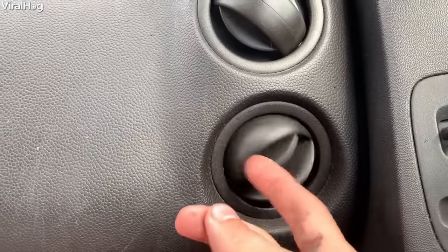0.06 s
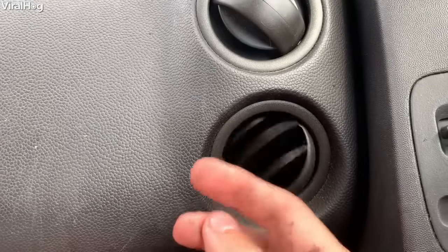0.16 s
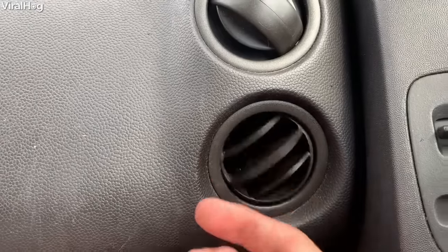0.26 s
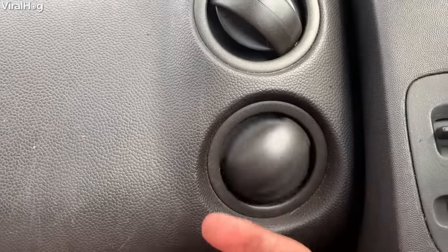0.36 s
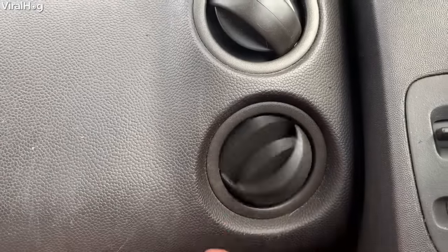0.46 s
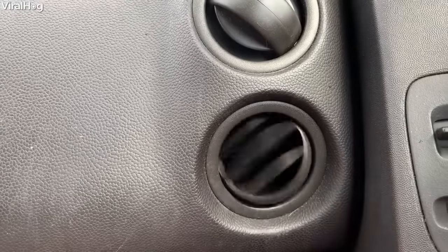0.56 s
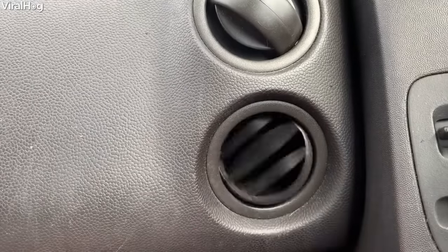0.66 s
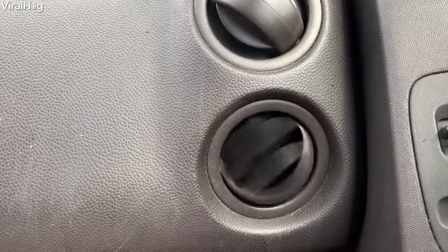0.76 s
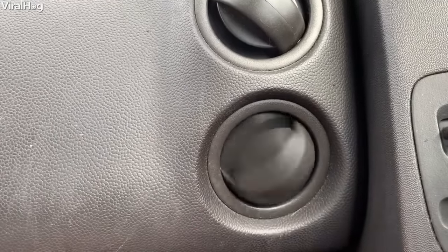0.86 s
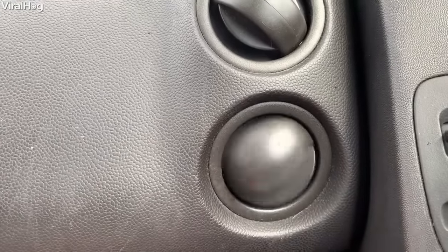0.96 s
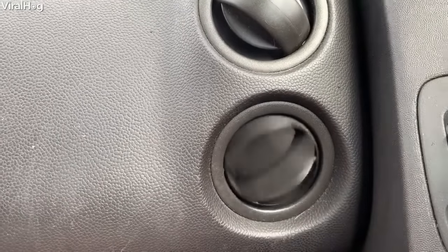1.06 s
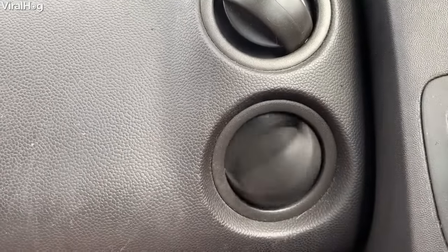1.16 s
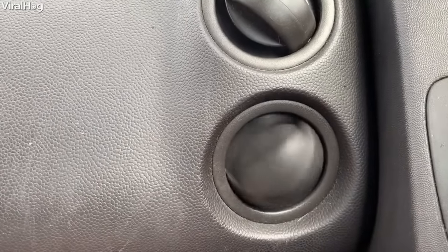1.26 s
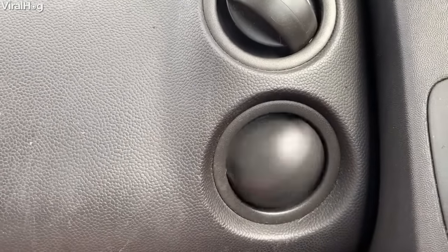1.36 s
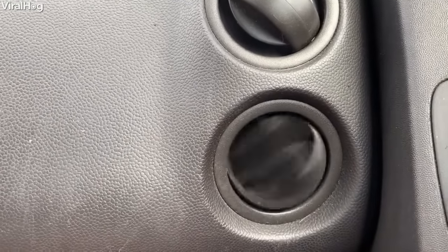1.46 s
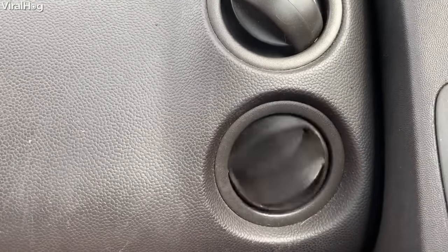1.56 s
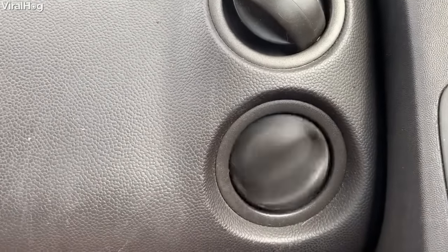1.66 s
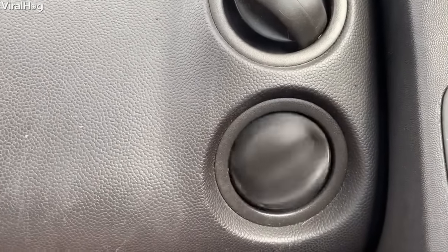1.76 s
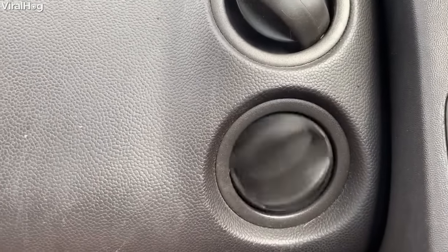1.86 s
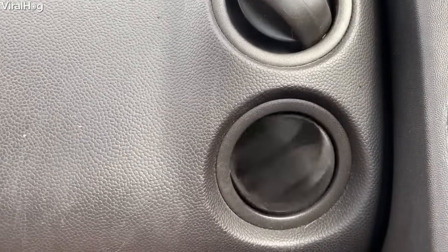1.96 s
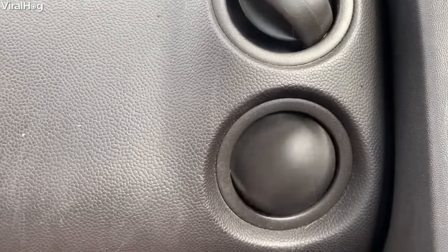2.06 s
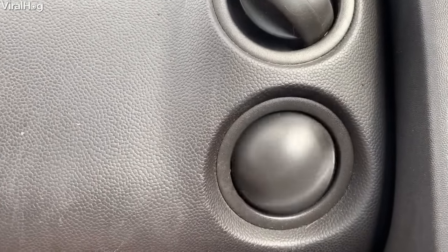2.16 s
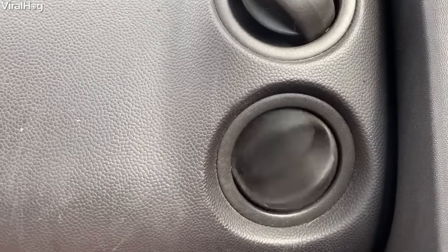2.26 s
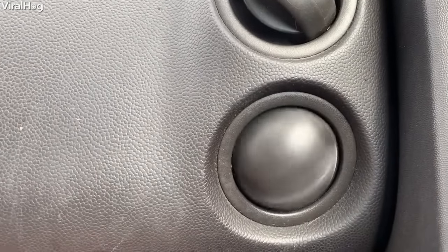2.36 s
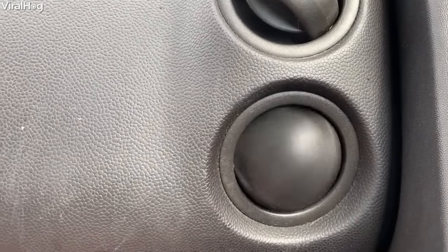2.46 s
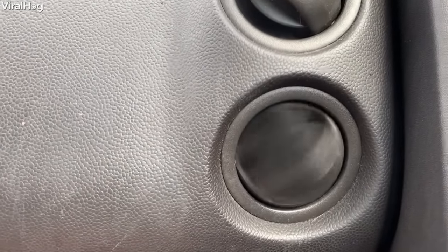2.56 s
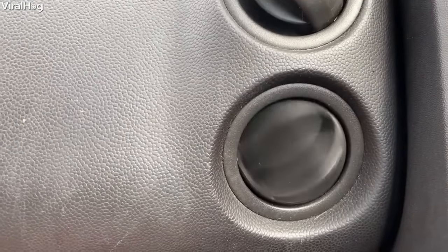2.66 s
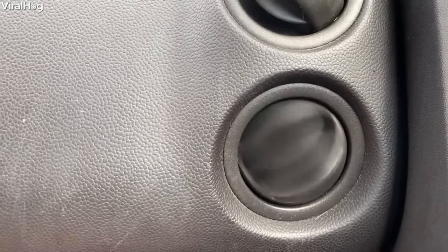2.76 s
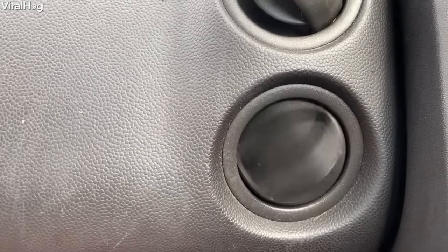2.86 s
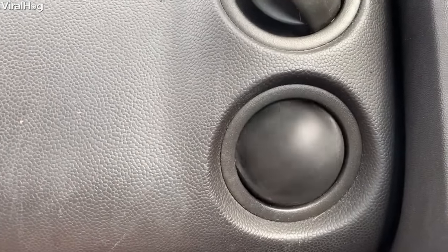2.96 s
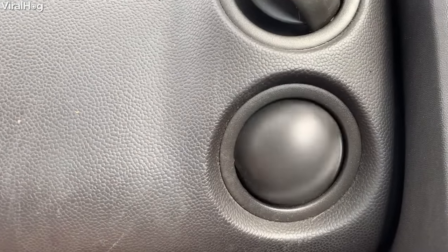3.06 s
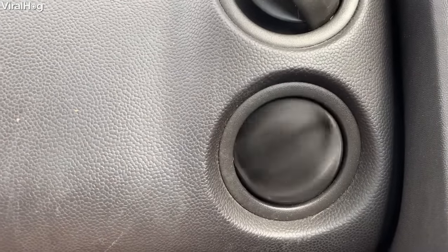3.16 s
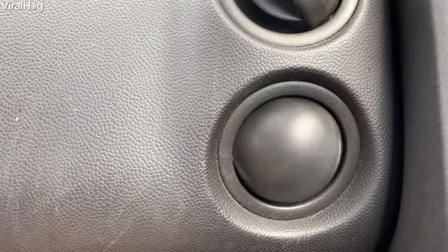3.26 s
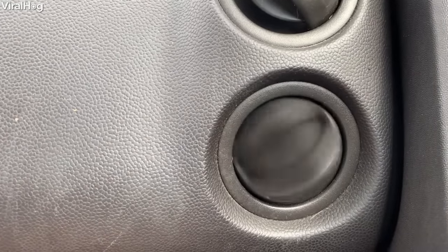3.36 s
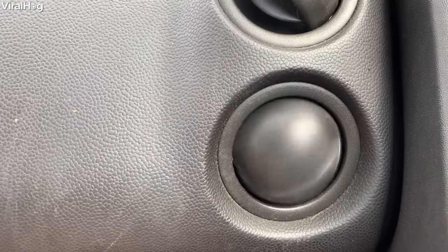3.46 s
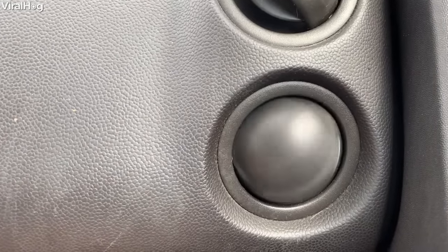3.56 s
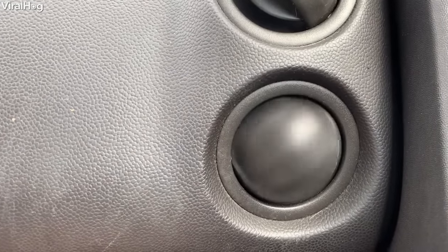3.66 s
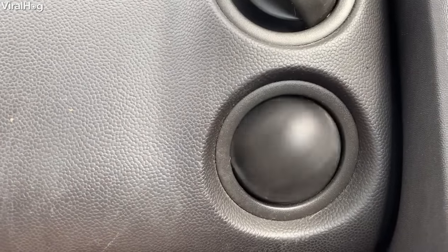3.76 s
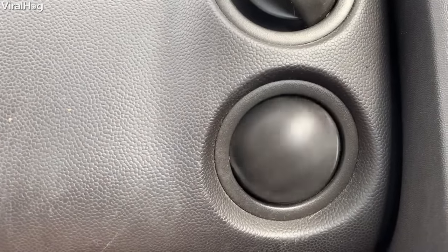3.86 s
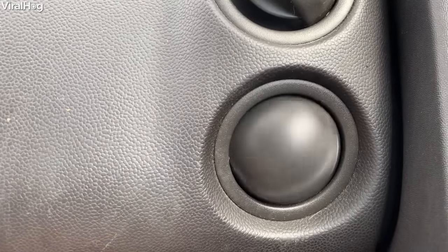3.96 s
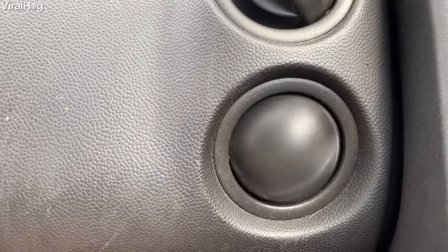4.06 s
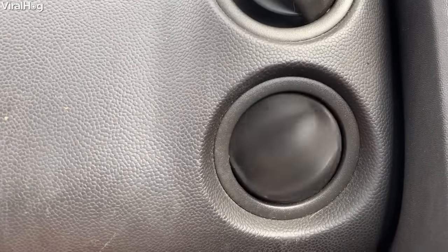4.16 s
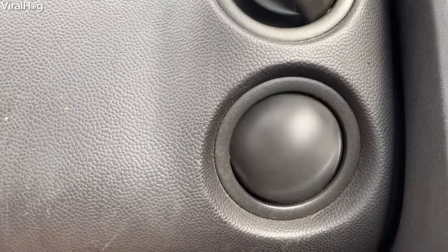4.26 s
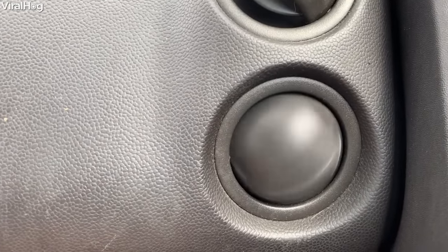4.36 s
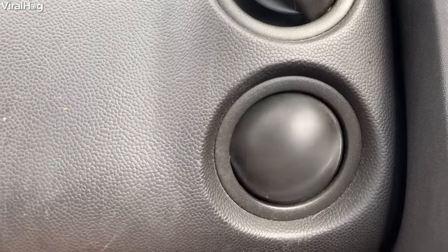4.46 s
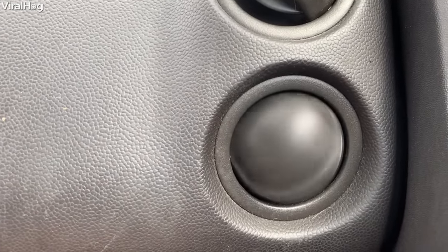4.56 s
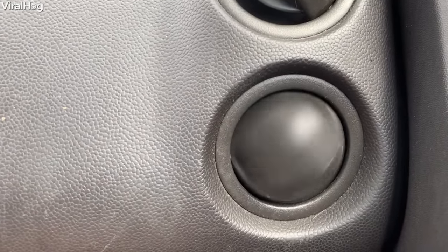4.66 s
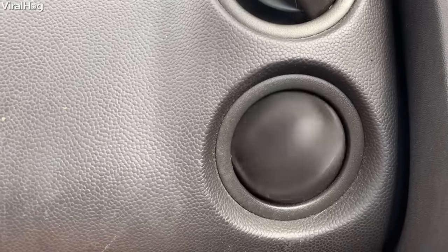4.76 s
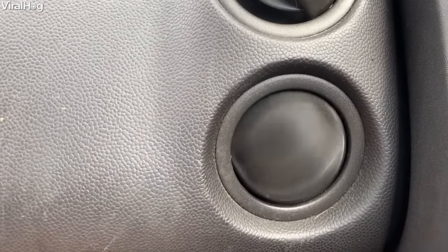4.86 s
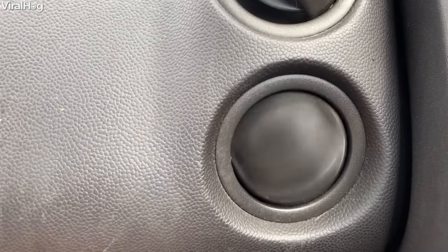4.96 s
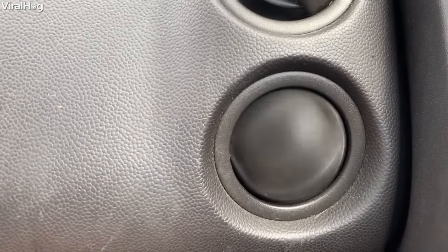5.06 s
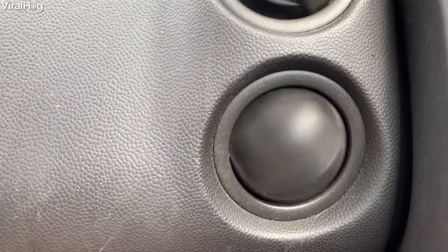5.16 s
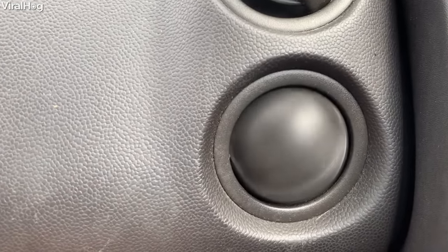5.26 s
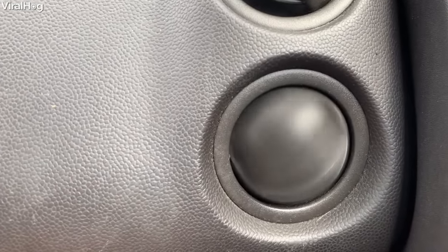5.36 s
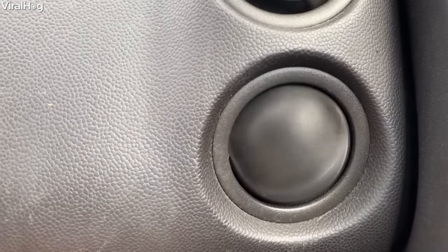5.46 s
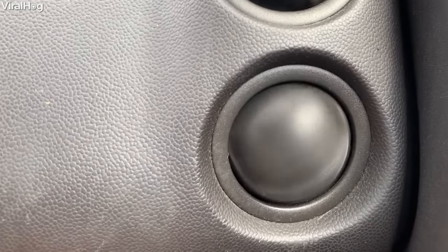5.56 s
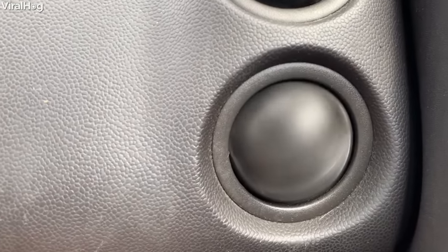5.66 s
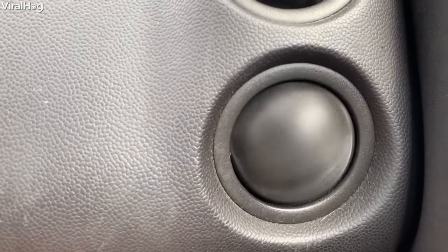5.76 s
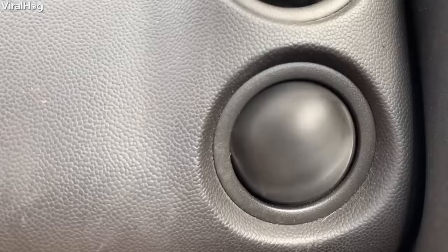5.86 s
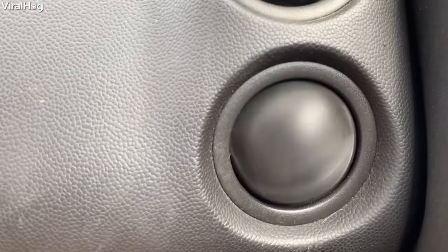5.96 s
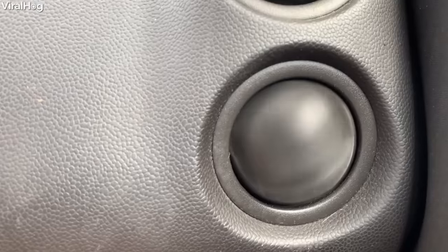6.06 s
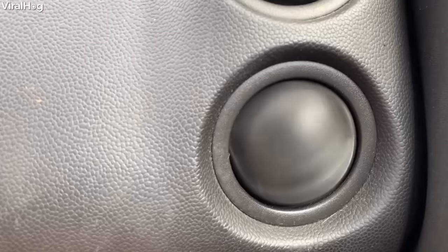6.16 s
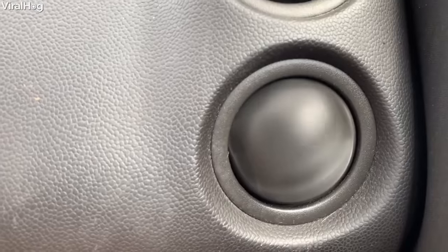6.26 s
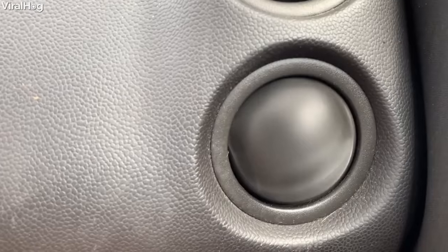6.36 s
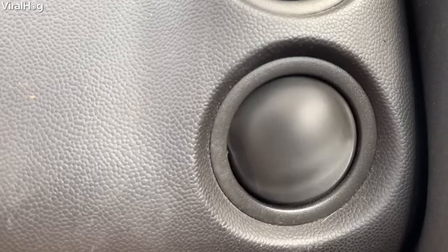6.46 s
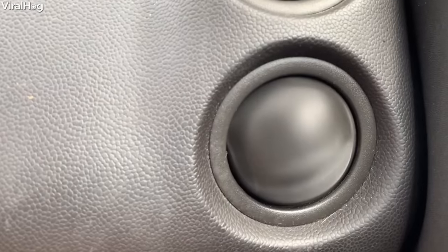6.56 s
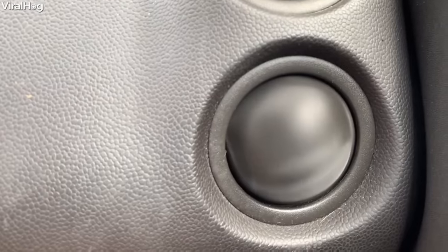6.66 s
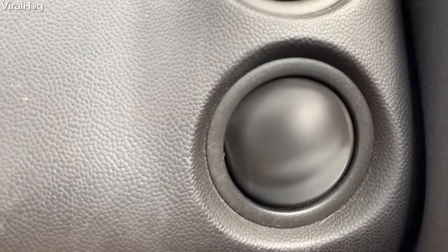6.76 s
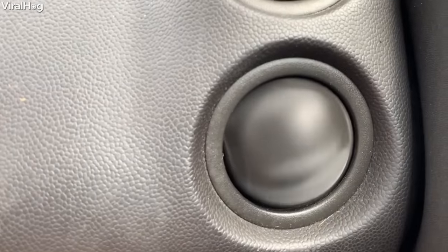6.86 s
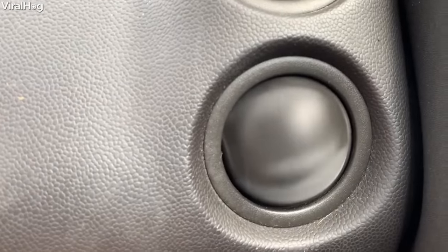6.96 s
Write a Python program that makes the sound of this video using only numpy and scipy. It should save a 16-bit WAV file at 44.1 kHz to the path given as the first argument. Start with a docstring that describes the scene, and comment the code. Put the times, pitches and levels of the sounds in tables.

```python
"""Spinning dashboard vent

The ball of a round dashboard vent, flicked by a finger and driven by the blower, spins ever faster,
its jet sweeping a stereo microphone. Timed lone gusts and soft knocks give way to a ragged flutter, then
a deep rising drone: partials locked to the turns, over lumpy noise eddies. Gated hiss spits on each turn.
Behind it, air rushes through the duct: filtered noise that flickers and is chopped by the ball."""
import sys
import numpy as np
from scipy import signal
from scipy.fft import rfft, irfft, next_fast_len
from scipy.io import wavfile
from scipy.ndimage import uniform_filter1d

SR = 44100
rng = np.random.default_rng(int(sys.argv[2]) if len(sys.argv) > 2 else 0)


def waveform_to_disk(signal):
    """Save audio, clipped to [-1, 1], as 16-bit WAV at the path in sys.argv[1]."""
    frames = np.transpose(np.atleast_2d(signal))
    scaled = np.clip(frames, -1, 1) * 32767
    samples = np.round(scaled).astype(np.int16)
    wavfile.write(sys.argv[1], SR, samples)


N = 309141


def from_db(db):
    """Decibels to gain."""
    return 10 ** (np.asarray(db) / 20)


def rms_one(x):
    """Scale to unit power."""
    return x / np.sqrt(np.mean(x ** 2) + 1e-20)


def along(rows, where):
    """Each further column of a table, read at values of its first column."""
    first, *columns = np.transpose(rows)
    return [np.interp(where, first, c) for c in columns]


def seconds():
    """Time of every sample."""
    return np.arange(N) / SR


def bins():
    """Frequency in Hz of every bin of a noise spectrum, at least 1."""
    size = next_fast_len(N, True)
    return np.maximum(np.arange(size // 2 + 1) * SR / size, 1)


def at_hz(points):
    """A table over log frequency, read at every bin."""
    hz, value = np.transpose(points)
    return np.interp(np.log(bins()), np.log(hz), value)


def white():
    """A flat random spectrum."""
    return rfft(rng.standard_normal(next_fast_len(N, True)))


def noise(colour):
    """Noise of a given colour, rms 1."""
    return rms_one(irfft(white() * from_db(at_hz(colour)))[:N])


def pair(colour, side_db):
    """Two channels sharing one noise, with a second noise added in opposite sense; rms 1."""
    return rms_one(noise(colour) + from_db(side_db) * noise(colour) * [[1], [-1]])


def drift(rate):
    """Smooth chance with about so many bends a second; spread 1."""
    return rms_one(irfft(white() / (1 + (bins() / rate) ** 2))[:N])


def per_turn(turns):
    """A fresh, bounded chance value for every turn, joined by straight lines."""
    draws = np.clip(rng.standard_normal(1000), -1.7, 1.7)
    return np.interp(turns, np.arange(len(draws)), draws)


def sweep(turns, centre, width):
    """A bump once a turn; centre and width in turns."""
    return np.exp((np.cos(2 * np.pi * (turns - centre)) - 1) / (2 * np.pi * width) ** 2)


def stroke(turns, lead, rise, fall, uneven_db):
    """A quick swell and decay once a turn, its strength drawn anew each turn; times in turns."""
    since = (turns + lead) % 1
    turn = (turns + lead).astype(int)
    strength = from_db(uneven_db * np.clip(rng.standard_normal(1000), -2, 2))[turn]
    return (1 - np.exp(-since / rise)) * np.exp(-since / fall) * strength


def onset(speed, halfway, steepness):
    """A share that rises from 0 to 1 as the speed passes a threshold."""
    return 1 / (1 + (halfway / speed) ** steepness)


# Likeness of the rush at the two sides of the microphone. Each row: frequency in Hz, likeness from 0 to 1.
LIKENESS = [(200, 1), (680, 1), (1000, 0.34), (1500, 0.29), (1900, 0.28), (2400, 0.32), (3200, 0.15),
            (4400, 0.2), (8100, 0.083), (15000, 0.34)]
# Its lean to one side. Each row: frequency in Hz, left-right level difference in dB.
LEAN = [(300, -1.5), (700, -0.5), (950, -7.5), (1350, -3.5), (2000, -0.7), (2700, -0.9), (5300, 2),
        (8120, 0), (15000, -.3)]
# Its phase between the sides. Each row: frequency in Hz, radians by which the left leads.
LEAD = [(300, -2.1), (700, 0), (1350, 0.44), (1850, 4.5), (2450, 0), (3100, -2.5), (4500, 1.5), (6000, 1.3),
        (8000, 4.5), (15000, 5.5)]


def airstream(colour_db):
    """Stereo hiss that reaches the two sides by different paths; rms 1 from 2 to 7 kHz."""
    alike = np.clip(at_hz(LIKENESS), 0, 1)
    sides = np.array([[1], [-1]])
    field = np.sqrt(1 + alike) * white() + np.sqrt(1 - alike) * white() * sides
    level = from_db(colour_db + sides * at_hz(LEAN) / 2)
    field = field * level * np.exp(1j * sides * at_hz(LEAD) / 2)
    treble = irfft(field.mean(axis=0) * (bins() > 2000) * (bins() < 7000))
    return irfft(field)[:, :N] / treble.std()


# Wavering of the rush, band by band. Each row: band centre in Hz, depth in dB.
FLICKER = [(300, 1.5), (700, 2), (1400, 1.5), (2600, 2), (5000, 1.8), (9000, 3), (14000, 4.5)]


def flicker(air):
    """Turbulence makes each band of the rush waver on its own."""
    spectrum = rfft(air, next_fast_len(N, True))
    out = 0
    for hz, depth_db in FLICKER:
        band = at_hz([(centre, centre == hz) for centre, _ in FLICKER])  # neighbours crossfade
        waver = rms_one(from_db(depth_db * drift(rate=37)))
        out = out + irfft(spectrum * band)[:, :N] * waver
    return out


# Air rushing past a slow ball, before the duct. Each row: frequency in Hz, level in dB per Hz.
SLOW_RUSH = [(120, -6), (230, -1), (380, 1.5), (520, -6), (680, -3), (820, -7), (1000, -10.5), (1590, -9.5),
             (2170, -10.5), (2600, -11.5), (5730, -17.5), (7700, -18), (10000, -18), (14000, -23.5),
             (16000, -47)]
# Air rushing past a fast ball. Each row: frequency in Hz, level in dB per Hz.
FAST_RUSH = [(300, -10), (700, -1), (1200, -3.5), (1650, -11), (1800, -9), (1900, -5.5), (2050, -8.5),
             (2550, -7), (3100, -14), (4200, -11.5), (6200, -13), (9000, -16), (16000, -30)]
# Resonances of the duct. Each row: frequency in Hz, width in Hz, boost in dB.
DUCT = [(676, 77, 7), (1002, 57, 9), (1360, 22, 2), (1596, 76, 5), (2480, 140, 4.5), (2710, 28, 10.5),
        (4160, 320, 4.5), (5910, 1180, 7.5), (8940, 290, 10.5)]
# Hiss of the slot's edges once the ball turns. Each row: frequency in Hz, level in dB per Hz.
EDGE_HISS = [(2050, -30), (2480, 1), (2780, -5), (3100, -16), (3800, -15), (4300, -4), (5000, -25),
             (7000, -8), (10000, -37)]
EDGE_HISS_DB, EDGE_HISS_SPEED = -4, 20  # dB against the rush; speed half-way there, turns per s


def rush(speed, turns):
    """Blower air through the duct; the fast ball chops it and smears the duct's resonances."""
    duct_db = sum(db / (1 + (2 * (bins() - hz) / width) ** 2) for hz, width, db in DUCT)
    smeared = np.clip((speed - 36) / 16, 0, 1)
    edge_gain = from_db(EDGE_HISS_DB) * onset(speed, EDGE_HISS_SPEED, steepness=5.9)
    slow_air = airstream(at_hz(SLOW_RUSH) + duct_db) + edge_gain * airstream(at_hz(EDGE_HISS))
    fast_air = airstream(at_hz(FAST_RUSH))
    air = np.sqrt(1 - smeared) * slow_air + np.sqrt(smeared) * fast_air
    depth = .8 * np.clip(speed / 30, 0, 1) + 1.6 * smeared
    chop = 1 + depth * stroke(turns, lead=.11, rise=.08, fall=.27, uneven_db=1.3)
    # over each quarter second, chopping moves the air about but adds none
    chop = chop / np.sqrt(uniform_filter1d(chop ** 2, size=SR // 4))
    flicker_db = (.5 + .2 * smeared) * drift(rate=25)
    return flicker(air) * chop * from_db(flicker_db)


# Hiss of the slot cutting the jet, slower ball. Each row: frequency in Hz, level in dB per Hz.
SPIT_COLOUR = [(1500, -21), (4000, -13), (6500, -5.5), (8300, 2), (9700, -5), (11600, 3), (13200, -8),
               (15000, -3), (16000, -5)]
# The same hiss, faster ball. Each row: frequency in Hz, level in dB per Hz.
FAST_SPIT_COLOUR = [(1500, -22), (4000, -14), (6500, -7), (8300, -1), (9700, -6), (11600, 4.5), (13200, -4),
                    (15000, 1), (16000, -1)]
SPIT_FROM_SPEED, SPIT_STEEPNESS = 48.3, 22  # speed half-way in, turns per s


def spit(speed, turns):
    """The slot's edge cuts the jet before each puff: a quick, surging hiss that brightens with speed."""
    lead = .23 - .012 * np.clip(speed - SPIT_FROM_SPEED, 0, 10)
    gate = stroke(turns + .02 * drift(rate=25), lead=lead, rise=.06, fall=.095, uneven_db=2.2)
    gate = uniform_filter1d(gate, size=60)  # the edge takes a moment to cross the jet
    second = sweep(turns, centre=0.4, width=0.075) * from_db(5 * per_turn(turns))
    gate = gate + 0.025 + 0.05 * second
    surge_db = 2.1 * np.tanh(drift(rate=20))
    bright = onset(speed, halfway=56.5, steepness=30)
    slow_hiss = np.sqrt(1 - bright) * pair(SPIT_COLOUR, side_db=-10.0)
    fast_hiss = np.sqrt(bright) * pair(FAST_SPIT_COLOUR, side_db=-0.5)
    return rms_one((slow_hiss + fast_hiss) * gate * from_db(surge_db))


def stall(speed, turns):
    """After some turns of the fast ball the hiss drops back for a moment."""
    depth = np.clip(per_turn(turns - .5) - .2, 0, .85) * onset(speed, halfway=47, steepness=30)
    return 1 - depth * sweep(turns, centre=0.4, width=0.12)


# Knocks of the flicked ball in its socket. Each row: start in seconds, level in dB.
KNOCKS = [(.3645, -11.5), (.372, -9.5), (.5028, -12)]
# Modes of the plastic socket. Each row: frequency in Hz, level in dB, 60 dB decay time in seconds.
SOCKET = [(88, 5.5, 0.053), (245, 3, 0.029), (378, 7.5, 0.018), (490, -5.5, 0.047), (700, -3, 0.026),
          (1110, -12, 0.026), (1340, -15, 0.019), (1700, -18, 0.017)]


def knocks():
    """Each soft knock sets the plastic socket ringing for an instant."""
    out = np.zeros(N)
    for s, db in KNOCKS:
        age = np.maximum(seconds() - s, 0)
        for k, (hz, mode_db, t60) in enumerate(SOCKET):
            level = from_db(db + mode_db - 60 * np.minimum(age / t60, 4))
            out += (-1) ** k * level * np.sin(2 * np.pi * hz * age)
    return signal.sosfilt(signal.butter(4, 2000, fs=SR, output="sos"), out)


# Gusts on the microphone: lone ones while the ball is slow, then a few slaps ringing at about 150-185 Hz. #
# Each row: start in seconds, swing level in dB, swing frequency in Hz, burst level in dB, burst length in
# seconds.
GUSTS = [(0.186, -10.5, 34.6, -24.5, 0.028), (0.248, -19, 75, -26.5, 0.02), (0.37, -4.5, 141, -24.5, 0.017),
         (0.434, -24, 70, -25.5, 0.031), (0.499, -3.5, 89.5, -19, 0.0155), (0.53, -6.5, 58.6, -25, 0.012),
         (0.611, -9.5, 58, -22.5, 0.011), (0.81, -11, 55, -25.5, 0.014), (1.522, -10.5, 51, -27, 0.013),
         (2.283, -16, 85.5, -31, 0.008), (2.318, -7.5, 75, -22.5, 0.0062), (2.384, -5, 185, -25, 0.0072),
         (2.721, -3.5, 150, -20, 0.0096), (2.776, -4, 169, -23, 0.02)]
# Rough air in a gust. Each row: frequency in Hz, level in dB per Hz.
BURST_COLOUR = [(60, -25), (180, 5.5), (350, 4), (700, -8), (1500, -17.5), (2200, -25), (5000, -57)]


def gusts():
    """Each gust swings the pressure about once and carries a short rough burst."""
    swings, bursts = np.zeros(N), np.zeros(N)
    for s, swing_db, swing_hz, burst_db, length in GUSTS:
        age = np.maximum(seconds() - s, 0)
        cycles = age * swing_hz
        envelope = np.exp(-np.minimum(((cycles - .75) / 0.61) ** 2, 50))
        swings += from_db(swing_db) * np.sin(2 * np.pi * cycles) * envelope
        bursts += from_db(burst_db) * (1 - np.exp(-age / 0.00036)) / (1 + (age / length) ** 4)
    return swings + bursts * pair(BURST_COLOUR, side_db=-16)


# Roar in the wake of the slot. Each row: frequency in Hz, level in dB per Hz.
CHURN = [(100, -1), (350, -1.5), (650, -14), (1200, -17.5), (1600, -28), (4000, -60)]


def churn(turns):
    """Low roar in the wake of the slot, a slap on every turn."""
    gate = 0.52 + stroke(turns, lead=0.048, rise=0.077, fall=0.28, uneven_db=4.5)
    return rms_one(pair(CHURN, side_db=3.5) * gate)


# Turbulence on the microphone. Each row: frequency in Hz, level in dB per Hz.
EDDIES = [(12, -40), (22, -1), (43, 3), (80, 0), (140, -5), (200, -6.5), (250, -15), (430, -22.5),
          (610, -27), (820, -53), (1200, -40), (2600, -110)]
HOLLOW_HZ, HOLLOW_WIDTH_HZ = 157, 39  # resonance of the hollow behind the ball
# ringing against the lumps, in dB: off its best speed, at it; that speed and its spread, turns per s
RING_DB, RING_BEST_DB, RING_SPEED, RING_SPREAD = -15.5, -1, 22.6, 5.7


def eddies(speed, turns):
    """Lumpy turbulence, swelling once a turn, joined by kicks that ring the hollow behind the ball."""
    lumps = pair(EDDIES, side_db=-14.5) * (1 + 0.21 * sweep(turns, centre=0.23, width=0.086))
    lumps = rms_one(lumps)
    kick_level = 0.087 + stroke(turns, lead=0.074, rise=0.027, fall=0.12, uneven_db=5.0)
    kicks = rng.standard_normal(N) * kick_level
    hollow = signal.iirpeak(HOLLOW_HZ, HOLLOW_HZ / HOLLOW_WIDTH_HZ, fs=SR)
    ring = rms_one(signal.lfilter(*hollow, kicks))
    ring = rms_one(signal.sosfilt(signal.butter(4, 0.97 * HOLLOW_HZ, fs=SR, output="sos"), ring))
    nearness = np.exp(-((speed - RING_SPEED) / RING_SPREAD) ** 2)
    share = from_db(RING_DB + (RING_BEST_DB - RING_DB) * nearness)
    return (lumps + share * ring) / np.sqrt(1 + share ** 2)


def causal_phase(gains):
    """Phase that lets the resonances in a row of partials ring on after the blow, never before it."""
    level = np.log(np.maximum(gains, from_db(-45)))
    level = np.vstack([level[:1] - 1.5, level, level[-2::-1]])  # mirrored into a full spectrum
    return -signal.hilbert(level, axis=0).imag[1:len(gains) + 1]


# One puff at the reference speed. Each row: frequency in Hz, relative level in dB.
PUFF = [(30, -3.2), (56, 0.3), (110, -3.3), (160, -2.8), (184, -9), (210, -8), (234, -14), (262, -12.5),
        (310, -13), (386, -10.3), (466, -17), (680, -25.2), (800, -31), (1000, -32.3), (1250, -37),
        (1600, -60)]
# The vent's own colour, through which the partials climb. Each row: frequency in Hz, gain in dB.
VENT = [(500, 1), (550, 1), (615, -3.5), (672, 7), (770, -6.5), (930, 2.5), (1070, -6), (1240, 2.5),
        (1420, -2), (1560, -31)]
# Second slap, from the slot's far edge. Each row: frequency in Hz, strength as a share of the first.
FAR_EDGE = [(130, 0.24), (700, 0.33)]
PUFF_SPEED = 51.6  # reference speed, turns per s
# octaves above the dip (Hz) grow as this power of the speed; below it the colour stays put
PUFF_STRETCH, PUFF_DIP_HZ = 0.71, 222
# far edge: delay in turns, added turns per turn per s above PUFF_SPEED, speed half-way in (turns per s)
SLOT_TURNS, SLOT_WIDENING, FAR_EDGE_SPEED = 0.2687, 0.0042, 40
# speed (turns per s) at which the chance values are scaled by: strength in dB, timing in turns,
# hardness of the edge in dB per octave
RAGGED_SPEED, UNEVEN_DB, WOBBLE_TURNS, HARDNESS_DB = 33, 1.6, .009, .5


def puffs(speed, turns, bass_turn, bass_hz, delay, count=32):
    """One pulse a turn: a sharp suck, the vent ringing after, bass turned in phase, a far-edge slap."""
    ragged = np.clip((RAGGED_SPEED / np.maximum(speed, 1)) ** 3, 0, 1.5)  # slow puffs are uneven
    angle = 2 * np.pi * (turns - delay + WOBBLE_TURNS * ragged * per_turn(turns))
    hardness = per_turn(turns) * np.sqrt(ragged)
    # level and phase of every partial, on a grid of speeds
    speeds = np.linspace(speed.min(), speed.max(), 200)
    hz = np.arange(1, count + 1)[:, None] * speeds
    octaves = np.log2(hz / PUFF_DIP_HZ)
    stretched = octaves / (speeds / PUFF_SPEED) ** PUFF_STRETCH
    octaves = np.where(octaves > 0, stretched, octaves)
    colour = [(np.log2(f / PUFF_DIP_HZ), db) for f, db in PUFF]
    gains = from_db(along(colour, octaves)[0] + along(VENT, hz)[0])
    slot = 2 * np.pi * (SLOT_TURNS + SLOT_WIDENING * np.maximum(speed - PUFF_SPEED, 0))
    far_onset = onset(speed, FAR_EDGE_SPEED, steepness=8.7)
    out, power = 0, 0
    for k, (partial, lag) in enumerate(zip(gains, causal_phase(gains)), 1):
        gain = np.interp(speed, speeds, partial)
        bass_phase = bass_turn * np.exp(-(k * speed / bass_hz) ** 2)  # radians
        phase = k * angle + np.interp(speed, speeds, lag) + bass_phase
        far = along(FAR_EDGE, k * speed)[0] * far_onset
        edge = from_db(HARDNESS_DB * hardness * np.log2(np.minimum(k, 8)))
        out = out - gain * edge * (np.cos(phase) + far * np.cos(phase - k * slot))
        power = power + gain ** 2 / 2
    return out / np.sqrt(power) * from_db(UNEVEN_DB * ragged * per_turn(turns))


# buffeting: dB for a slow ball, rise in dB, speed half-way up (turns per s), steepness,
# creep (dB per turn per s)
BUFFET_DB, BUFFET_RISE_DB, BUFFET_SPEED, BUFFET_STEEPNESS, BUFFET_CREEP_DB = -24.5, 9, 21.7, 9.3, 0.07
# regular puffs: dB against the buffeting, speed half-way in (turns per s), steepness
PUFF_DB, PUFF_FROM_SPEED, PUFF_STEEPNESS = -0.7, 21.2, 2.7
# loose eddies: dB against the buffeting, speed half-way out (turns per s), steepness,
# thinning (dB per turn per s)
EDDY_DB, EDDY_UNTIL_SPEED, EDDY_STEEPNESS, EDDY_THINNING_DB = 3, 54, 13, 0.23
# wake of the slot: dB against the buffeting, growth (dB per turn per s)
WAKE_DB, WAKE_GROWTH_DB = -20.5, 0.0242


def jet(speed, turns):
    """The jet on the microphone: louder with speed, and turning from loose eddies into regular puffs."""
    buffet_rise_db = BUFFET_RISE_DB * onset(speed, BUFFET_SPEED, BUFFET_STEEPNESS)
    buffet_db = BUFFET_DB + buffet_rise_db + BUFFET_CREEP_DB * speed
    regular = from_db(PUFF_DB) * onset(speed, PUFF_FROM_SPEED, PUFF_STEEPNESS)
    dying = 1 - onset(speed, EDDY_UNTIL_SPEED, EDDY_STEEPNESS)
    loose = from_db(EDDY_DB - EDDY_THINNING_DB * speed) * dying
    wake = from_db(WAKE_DB + WAKE_GROWTH_DB * speed)
    drone = puffs(speed, turns, bass_turn=3.84, bass_hz=120.0, delay=-0.016)
    return from_db(buffet_db) * (regular * drone + loose * eddies(speed, turns) + wake * churn(turns))


# driven speed at the start (turns per s), its gain per s; drag: start and easing time in s;
# speed it eases towards (turns per s)
FLICK_SPEED, SPEED_GAIN_PER_S, DRAG_FROM_S, DRAG_EASE_S, TOP_SPEED = 3.381, 9.713, 4.3965, 7.149, 99.06
# rubbing in the socket: speed lost, speed at which it is half gone (turns per s), steepness
RUB_LOSS, FREE_SPEED, FREE_STEEPNESS = .45, 27.5, 30


def spin():
    """Speed of the ball in turns per s: an even run-up, held back at first by rubbing, then eased by drag."""
    t = seconds()
    driven = FLICK_SPEED + SPEED_GAIN_PER_S * np.minimum(t, DRAG_FROM_S)
    driven = driven - RUB_LOSS * (1 - onset(driven, FREE_SPEED, FREE_STEEPNESS))
    eased = 1 - np.exp(-np.maximum(t - DRAG_FROM_S, 0) / DRAG_EASE_S)
    return driven + (TOP_SPEED - driven) * eased


# Rush through the duct, before the trim below. Each row: time in seconds, level in dB.
RUSH_LEVEL = [(0.03, -37.5), (0.09, -38.5), (0.51, -38), (0.55, -41), (0.68, -40), (2.28, -38.6),
              (2.34, -37), (3.0, -37.4), (4.4, -40.5), (6.87, -40.5), (6.95, -39.5)]
RUSH_TRIM_DB = 0.5
# spit: dB at its onset speed, growth (dB per turn per s), dB of the faint hiss beneath it
SPIT_DB, SPIT_GROWTH_DB, SPIT_IDLE_DB = -34.5, 0.05, -63
START_TURN = .92
# lean of the bass: corner in Hz, left-right dB, speed half-way there (turns per s)
BASS_HZ, JET_PAN_DB, JET_PAN_SPEED = 150, -2.7, 35


def scene():
    """The ball's speed drives flutter and spit over the rush of the duct."""
    speed = spin()
    turns = START_TURN + np.cumsum(speed) / SR

    rush_db = RUSH_TRIM_DB + along(RUSH_LEVEL, seconds())[0]
    spit_db = SPIT_DB + SPIT_GROWTH_DB * (speed - SPIT_FROM_SPEED)
    spitting = from_db(spit_db) * onset(speed, SPIT_FROM_SPEED, SPIT_STEEPNESS)
    idle = from_db(SPIT_IDLE_DB) * onset(speed, halfway=30, steepness=3)
    hiss = from_db(rush_db) * rush(speed, turns) + (idle + spitting) * spit(speed, turns)

    flutter = jet(speed, turns) + gusts() + knocks()
    bass = signal.sosfilt(signal.butter(1, BASS_HZ, fs=SR, output="sos"), flutter)
    pan_db = JET_PAN_DB * onset(speed, JET_PAN_SPEED, steepness=8.7)
    flutter = flutter + bass * (from_db(pan_db / 2 * [[1], [-1]]) - 1)
    return flutter + hiss * stall(speed, turns)


CUTOFF_HZ = 16100


def record(dry):
    """At the microphone the largest swings are rounded and the extreme treble is cut."""
    rounded = 1.1 * np.tanh(dry / 1.1)
    return signal.sosfilt(signal.cheby2(16, 70, CUTOFF_HZ + 600, fs=SR, output="sos"), rounded)


dry = scene()
out = record(dry)
waveform_to_disk(out)
```